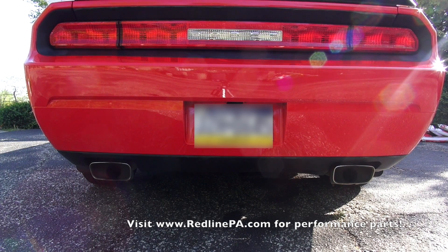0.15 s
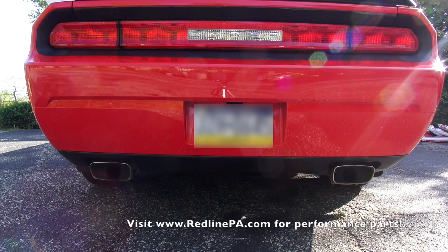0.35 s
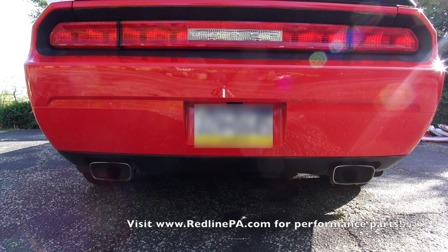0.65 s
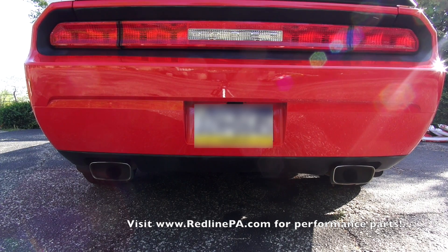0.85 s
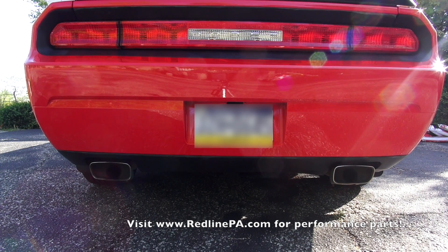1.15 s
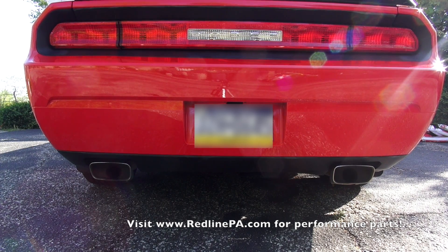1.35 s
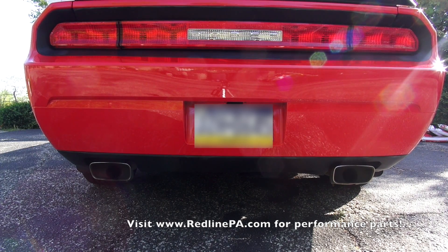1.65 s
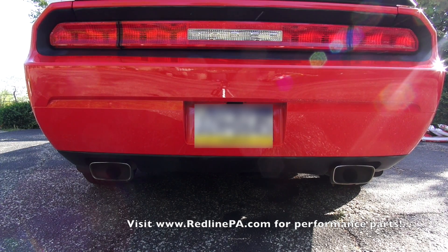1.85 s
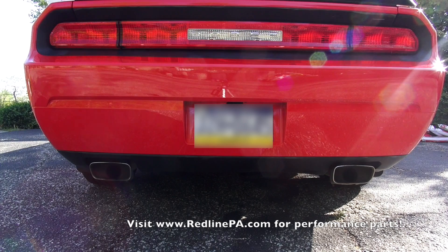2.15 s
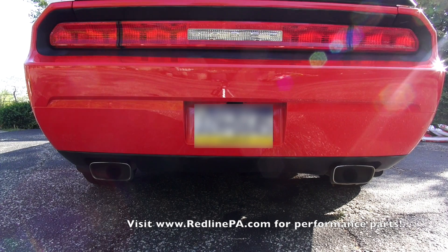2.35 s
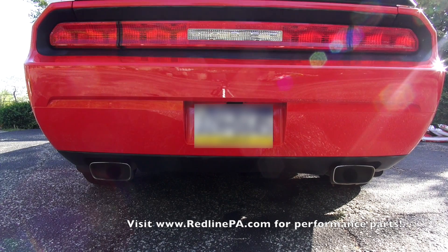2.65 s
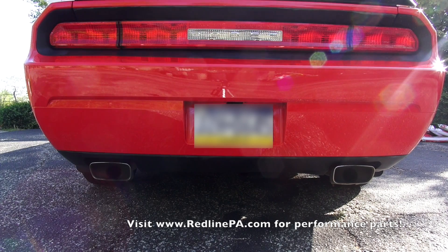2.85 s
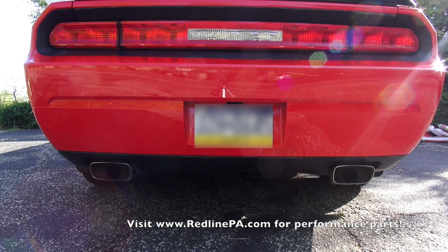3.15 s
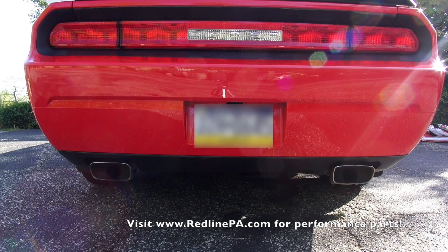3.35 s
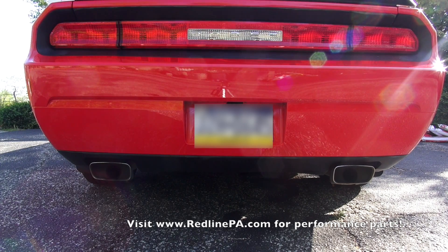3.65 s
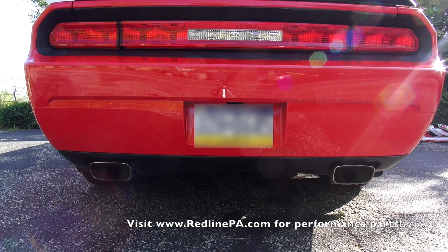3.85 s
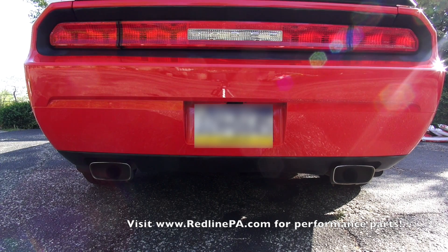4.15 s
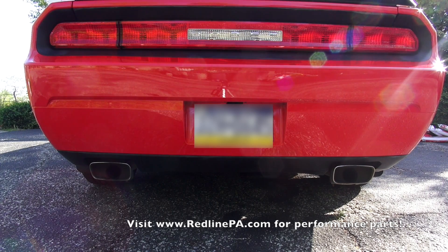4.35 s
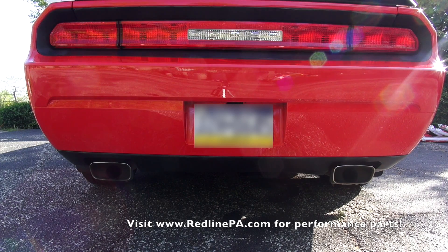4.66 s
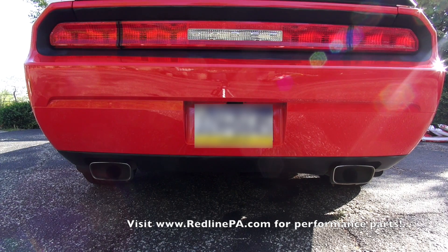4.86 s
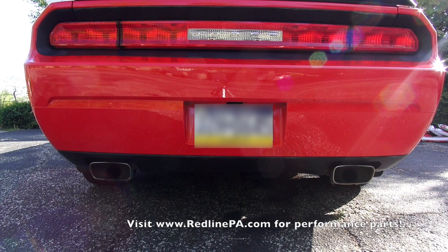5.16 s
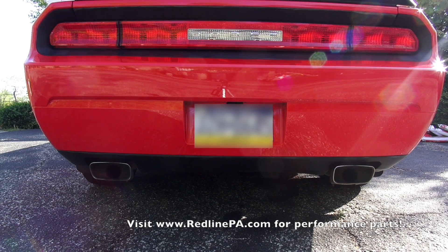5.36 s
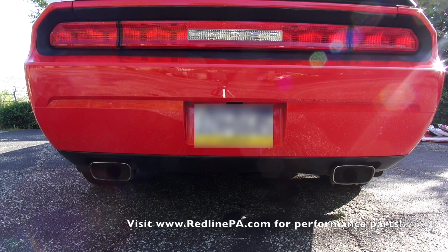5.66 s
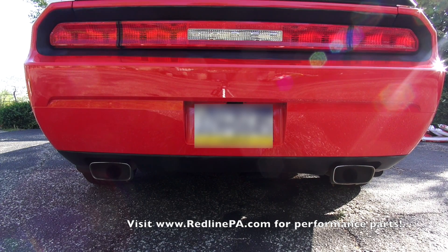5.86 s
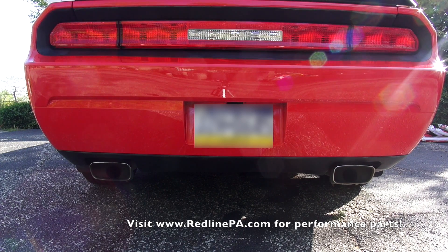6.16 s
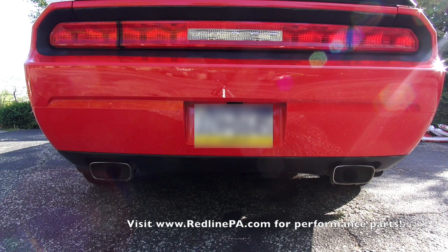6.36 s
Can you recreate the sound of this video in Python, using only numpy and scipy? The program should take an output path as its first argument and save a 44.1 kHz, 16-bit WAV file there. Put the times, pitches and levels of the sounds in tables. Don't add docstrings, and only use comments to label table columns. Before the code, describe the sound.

Close behind two tailpipes in a driveway, a large eight-cylinder engine is already spinning fast and dropping. It is revved hard to a raspy, cracking roar, then the pitch slides down for several seconds into a loose, lumpy burble with soft pops. A small throbbing blip follows and settles back to uneven idle. Outdoor stereo pickup, with faint scattered echoes and slight limiting on peaks.

```python
import sys
import numpy as np
from scipy import signal
from scipy.fft import rfft, irfft, next_fast_len
from scipy.io import wavfile
from scipy.ndimage import uniform_filter1d

SR = 44100
rng = np.random.default_rng(int(sys.argv[2]) if len(sys.argv) > 2 else 0)


def field_ratio(decibels):
    return 10 ** (np.asarray(decibels, dtype=float) / 20)


def output_pcm(signal):
    pcm = np.clip(np.atleast_2d(signal).T, -1, 1) * 32767
    wavfile.write(sys.argv[1], SR, np.round(pcm).astype(np.int16))


N = 286650

# (time [s], firing rate [Hz])
ENGINE_SPEED = [(0.0, 263), (0.14, 259.5), (0.42, 220.3), (0.72, 185.5), (0.79, 183.3), (0.86, 201.9),
                (1.12, 322), (1.21, 358.5), (1.28, 372.7), (1.36, 365), (1.55, 326.5), (2.57, 180.3),
                (4.95, 39.0), (5.36, 48.6), (5.5, 61.5), (5.7, 72.3), (6.13, 58.9), (6.5, 53.5)]
# (time [s], pressure pulse [dB], gas flow [dB], relative gas speed at the tips [-0.4 to 1])
DRIVE = [(0.0, -8.5, -10, 0.6), (0.08, -11, -18, 0.0), (0.76, -10.5, -24, 0.15), (0.84, -10.5, -15, 0.0),
         (1.06, -8.5, -12, 1), (1.26, -10, -11.5, 1.0), (1.29, -11, -13, 0.4), (1.81, -12, -17.5, 0.02),
         (2.6, -12.5, -27.5, 0.04), (2.97, -13, -24.5, 0.39), (3.88, -21, -40, 0.35),
         (4.1, -28, -40.5, -0.4), (4.25, -25.5, -42, -0.2), (4.9, -29, -44.5, -0.4), (5.28, -21, -37, -0.3),
         (5.65, -8.5, -30, 0.5), (5.87, -15, -32.5, -0.1), (6.4, -21, -35.5, 0.1)]
# (opens [s], shuts [s])
THROTTLE = [
    (-0.4, 0.075),
    (0.783, 1.28),
    (5.35, 5.75),
]
# (multiple of the two-turn cycle [1], level [dB])
SIDE_LINES = [(2, -10), (3, -12), (4, -17), (5, -3), (6, 2), (7, -3.5), (9, 3), (10, 1), (11, 5), (12, -13),
              (13, 2.5), (14, 9), (15, 0), (17, 10), (18, -1.5), (19, -6), (20, 8.5), (21, 2.5),
              (22, -26.5), (23, 11), (24, 4), (25, -17.5), (26, -4), (27, -17.5), (28, 9.5), (29, -12.5),
              (30, -19), (31, -8.5), (32, 8)]
# (frequency [Hz], width [Hz], level [dB])
PIPE_MODES = [(61, 59, -11), (115.2, 27.4, 4.5), (221.8, 65.3, 1.5), (369.7, 29.5, -1), (484.6, 27.3, -9.5),
              (599, 112, -21.5)]
PUFF_LEVELS = [-0.5, -8, -4.5, -19, -0.5, -4.5, -7, -8]
# (frequency [Hz], level [dB per Hz])
GAS_COLOUR = [(290, 7.5), (500, 7.5), (586, 3), (676, -1.5), (889, -3), (1140, 0), (1310, 2), (1560, -3),
              (1750, -7), (2510, -42), (3070, -22.5), (5000, -30), (7380, -39), (12000, -51.5),
              (15600, -61.5)]
# (frequency [Hz], width [Hz], level [dB])
GROUND_RIPPLES = [(774, 186, -3.5), (2506, 454, 13.5), (4750, 370, -2.5)]
# (frequency [Hz], width [Hz], level [dB])
TIP_RINGS = [(1092, 71, 4), (1806, 80, 3), (2950, 290, 3), (4050, 59, 3), (5730, 89, 1.5), (7640, 400, 1.5),
             (9100, 940, 2.5)]
# (from [s], a crack at [s], to [s], first level [dB], last level [dB])
CRACK_RUNS = [
    (0.02, 0.0373, 0.05, -15, -15),
    (0.9, 1.0268, 1.07, -22, -7),
    (1.075, 1.2034, 1.275, -10, -7),
    (1.3, 1.4938, 1.74, -13, -23),
    (1.29, 1.608, 1.72, -18, -22),
    (1.86, 1.8774, 1.89, -22, -22),
]
# (from [s], a pop at [s], to [s], first level [dB], last level [dB])
BLIP_RUNS = [
    (5.42, 5.5161, 5.615, -21, -16),
    (5.618, 5.5161, 5.77, -18, -23),
]
# (time [s], peak level [dB])
IDLE_POPS = [(3.4481, -36), (3.5604, -33), (3.725, -33), (3.8337, -31.5), (3.8876, -31), (3.939, -31.5),
             (3.9933, -42), (4.02, -35.5), (4.1696, -36), (4.2044, -31.5), (4.221, -32), (4.27, -35),
             (4.3026, -37), (4.358, -34), (4.47, -35), (4.4942, -35), (4.6059, -34), (4.725, -35),
             (4.7944, -34), (4.9337, -29.5), (4.9603, -28.5), (5.0433, -27), (5.0682, -28.5), (5.0956, -23),
             (5.1242, -20.5), (5.1672, -32), (5.215, -17), (5.2877, -20.5), (5.3336, -16.5), (5.3497, -22)]
# (time [s], peak level [dB])
POPS = [(2.8894, -26), (3.1266, -26), (5.3722, -16), (5.4142, -18), (5.6923, -19), (5.721, -20.5),
        (5.8046, -26), (5.8695, -28.5), (5.908, -21), (5.9204, -39), (5.9539, -30), (5.9692, -31),
        (6.0097, -46), (6.0651, -30), (6.1116, -27.5), (6.1429, -33), (6.2108, -25.5), (6.2626, -27),
        (6.2826, -26.5), (6.3114, -32), (6.3567, -32), (6.4313, -34), (6.4582, -50), (6.4806, -29)]
# (time [s], peak level [dB])
THUMPS = [(3.673, -10), (3.781, -11), (3.833, -15), (3.994, -15), (4.155, -17), (4.603, -16), (4.724, -17),
          (4.794, -18), (4.947, -16), (5.124, -10), (5.22, -11), (5.328, -10), (5.485, -4), (5.714, -5),
          (5.96, -5), (6.361, -12), (6.434, -11)]
# (frequency [Hz], left over right [dB])
TILT = [(60, 0.5), (110, 2.5), (200, 1.0), (380, -2.0), (700, -2.0), (1290, 0.0), (2380, -1.0),
        (4400, -0.5), (8120, -0.5), (15000, 0.0)]
# (frequency [Hz], level [dB])
ECHO_COLOUR = [(60, -31.5), (500, -20.5), (2000, -25.5), (3100, -29), (4400, -23), (5600, -15), (8500, -13),
               (10500, -12.5), (11800, -42)]

KNEE_HZ = 195


def evened(x):
    return x / np.sqrt(np.mean(x ** 2) + 1e-20)


def read(points, hz):
    f, value = np.transpose(points)
    return np.interp(np.log(hz + 1), np.log(f + 1), value)


def curves(rows):
    s, *columns = np.transpose(rows)
    return [np.interp(np.arange(N) / SR, s, c) for c in columns]


def colour(x, gain):
    size = next_fast_len(N + SR // 2)
    return irfft(rfft(x, size) * gain(np.fft.rfftfreq(size, 1 / SR)), size)[..., :N]


def levelled(x, seconds):
    return x / np.sqrt(uniform_filter1d(x ** 2, int(seconds * SR)) + 1e-12)


def band(x, lo_hz, hi_hz):
    return signal.sosfilt(signal.butter(3, [lo_hz, hi_hz], "bandpass", fs=SR, output="sos"), x)


def impulses(rows, offset_db):
    s, db = np.transpose(rows)
    out = np.zeros(N)
    out[(s * SR).astype(int)] = field_ratio(db + offset_db)
    return out


def controls():
    t = np.arange(N) / SR
    s, rate = np.transpose(ENGINE_SPEED)
    hz = np.exp(np.interp(t, s, np.log(rate)))
    snap_s = 0.01
    opened = 1. * sum((t > a) & (t < b) for a, b in THROTTLE)
    return (hz, *curves(DRIVE), uniform_filter1d(opened, int(snap_s * SR)))


def pipe(hz):
    total = 0
    for k, (f, width, db) in enumerate(PIPE_MODES):
        total = total + (-1) ** k * field_ratio(db) * 1j * hz * width / (f ** 2 - hz ** 2 + 1j * hz * width)
    return total


def yard_air():
    return field_ratio(-72) * evened(band(rng.standard_normal((2, N)), 5000, 10000))


def wall_echoes(car):
    taps = rng.standard_normal(6000) * (rng.random(6000) < .05) * np.exp(-np.arange(6000) / 600)
    echo = signal.oaconvolve(car, taps / np.linalg.norm(taps))[:N]
    return colour(echo, lambda f: field_ratio(read(ECHO_COLOUR, f)))


def gas_gain(hz):
    bumps = sum(db * np.exp(-((hz - f) / w) ** 2) for f, w, db in GROUND_RIPPLES + TIP_RINGS)
    return field_ratio(read(GAS_COLOUR, hz) + bumps)


def gas_noise(patchy_db):
    a, b, patches = rng.standard_normal((N // 64 + 5, 129, 3)).T
    patches = uniform_filter1d(patches, size=2, axis=0)
    patches = evened(uniform_filter1d(patches, size=7, axis=1))
    spectrum = (a + 1j * b) * field_ratio(patchy_db * np.minimum(patches, 1.8))
    return colour(signal.istft(spectrum, nperseg=256, noverlap=192)[1][:N], gas_gain)


def rasp(firings):
    fired = np.diff(np.floor(firings), prepend=0) > 0
    cylinder = firings.astype(int) % 8
    shared, *own = rng.standard_normal((9, 400)) * np.exp(-np.arange(400) / 110)
    out = np.zeros(N)
    for which, (db, train) in enumerate(zip(PUFF_LEVELS, own)):
        out += signal.oaconvolve(fired * (cylinder == which), field_ratio(db) * (.6 * shared + train))[:N]
    return levelled(band(colour(out, gas_gain), 377, 3380), 0.16)


def gas(firings, hz, flow_db, push):
    count = firings.astype(int)
    chance = np.clip(rng.standard_normal((count[-1] + 1, 3)), -3, 1.5)[count].T
    spread_db = 2.4 * (60 / hz) ** 0.2 * (0.43 * chance + 0.36 * chance.sum(0))
    since_firing_s = (firings % 1) / hz
    puff = field_ratio(np.array(PUFF_LEVELS)[count % 8] + spread_db) * np.exp(-since_firing_s / 0.0036)
    puff = uniform_filter1d(puff, size=36, axis=1)
    noise = gas_noise(patchy_db=2.0)

    locked = np.clip(hz / 430, .1, .5)
    roar = levelled((.7 + puff[0]) * band(noise, 550, 2300), .15)
    roar = np.sqrt(1 - locked) * roar + np.sqrt(locked) * rasp(firings)

    bite = levelled((0.89 + puff[1]) * band(rng.standard_normal(N), 1760, 2440), .15)
    bite_db = -27 + 14.5 * push

    steady = np.clip((-33 - uniform_filter1d(flow_db, SR // 3)) / 18, 0, .45)
    hiss = (.14 + steady + hz / 900 + puff[1]) * band(noise, 2300, 6000)
    hiss_db = -10 - 0.093 * (flow_db + 22.5) + 7.5 * push

    fizz = band(noise, 6350, 10820) + field_ratio(0.22 * (flow_db + 25.5)) * band(noise, 10620, 14400)
    fizz = fizz + field_ratio(np.minimum(1.5 * (flow_db + 19), 4)) * band(noise, 13800, 16500)
    fizz = (.17 + puff[2]) * fizz
    fizz_db = -25 - 0.47 * (flow_db + 26.5) + (13.5 + 6.5 * np.log2(hz / 200)) * push

    blast = roar + field_ratio(bite_db) * bite
    blast = blast + field_ratio(hiss_db - 3.9) * levelled(hiss, 0.29) + field_ratio(fizz_db - 4.1) * levelled(fizz, .2)
    return field_ratio(flow_db - 0.2) * blast


def runs(rows, firings, count, spread_db):
    t, found = np.arange(N) / SR, []
    for start, anchor, end, first_db, last_db in rows:
        s = np.interp(firings[int(anchor * SR)] + count * np.arange(-40, 41), firings, t)
        db = np.interp(s, [start, end], [first_db, last_db])
        db = db + spread_db * np.clip(rng.standard_normal(len(s)), -2, 1.5)
        found += [row for row in zip(s, db) if start < row[0] < end]
    return np.array(found)


def cracks(rows, roar_db, sigh_db, patchy_db, decay_s, drop_db, top_hz, bright):
    s, db = np.transpose(rows)
    t, out = np.arange(SR // 5) / SR, np.zeros(N)
    noise = signal.lfilter([1, -min(bright, 1)], 1, gas_noise(patchy_db))
    snap, roar, sigh = (0, 2300, top_hz, 1), (roar_db, 800, 2300, 1.5), (sigh_db, 2300, top_hz, 8)
    for level_db, lo_hz, hi_hz, slow in (snap, roar, sigh):
        starts = impulses(np.transpose([s, db + level_db]), drop_db)
        burst = (1 - np.exp(-t / 0.0003)) * np.exp(-t / (decay_s * slow))
        out += signal.oaconvolve(starts, burst)[:N] * levelled(band(noise, lo_hz, hi_hz), 0.012)
    return out


def all_cracks(firings):
    sharp = runs(CRACK_RUNS, firings, count=8, spread_db=1.5)
    roar_db = -15.5 - sharp[:, 1]
    out = cracks(sharp, roar_db, sigh_db=-30, patchy_db=2.5, decay_s=.002, drop_db=-2.5, top_hz=15700, bright=.6)
    out += cracks(IDLE_POPS + POPS, roar_db=6, sigh_db=-11, patchy_db=6.0, decay_s=0.0047, drop_db=-7.5,
                  top_hz=13500, bright=0.46)
    blip = runs(BLIP_RUNS, firings, count=1, spread_db=2.5)
    return out + cracks(blip, roar_db=4, sigh_db=-14, patchy_db=5.0, decay_s=.005, drop_db=-3,
                        top_hz=11000, bright=.25)


def thumps():
    blows = np.zeros(N)
    for rows, offset_db in ((THUMPS, -1.5), (IDLE_POPS + POPS, 7)):
        hits = impulses(rows, offset_db)
        blows = np.where(hits > 0, hits, blows)
    t, ring = np.arange(SR // 5) / SR, 0
    for hz, decay_s, size in ((122, 0.038, 1), (205, 0.011, 0.54), (62, 0.04, 0.27)):
        ring = ring + size * np.exp(-t / decay_s) * np.sin(2 * np.pi * hz * t)
    return signal.oaconvolve(blows, (1 - np.exp(-t / 0.0036)) * ring)[:N]


def rumble(firings, hz, pulse_db):
    knocks = np.diff(np.floor(firings), prepend=0) * rng.uniform(-1.76, 1.88, N)
    smear = rng.standard_normal(500) * np.exp(-np.arange(500) / 120)
    smear = smear + 14 * signal.unit_impulse(500)
    churn = 0.052 * rng.standard_normal(N)
    flow = signal.oaconvolve(knocks, smear / np.linalg.norm(smear))[:N] + churn
    full = colour(flow, lambda f: pipe(f) / (1 + (f / 2500) ** 2))
    deep = colour(flow, lambda f: pipe(f) / (1 + (f / 150) ** 4))
    even = np.clip(hz / 150 - .4, 0, .85) + 3.9 * np.minimum(np.log2(hz / 60), 0)
    share_db = -4 - 4.5 * np.log2(hz / 45)
    return field_ratio(pulse_db + share_db) * levelled(full - even * deep, .09)


def line_levels(hz, pulse_db, opened):
    octaves = np.log2(hz / KNEE_HZ)
    slow = np.minimum(octaves, 0)
    held_db = pulse_db + 35 * np.minimum(np.log2(hz / 59.1), 0)
    once, twice = (20 * np.log10(abs(pipe(m * hz))) for m in (1, 2))
    dip_db = -10 * np.exp(-(np.log2(hz / 80.7) / 0.25) ** 2)
    fire_db = held_db - 4 + 3.5 * opened + 0.27 * once - octaves + dip_db
    octave_db = held_db - 10 + 2 * opened + 1.56 * twice - 2.5 * octaves
    even_db = held_db - 6.5 - 3 * opened + 2.6 * slow
    odd_db = held_db - 6.5 - 1.5 * opened + 5.94 * slow
    return fire_db, octave_db, even_db, odd_db


def beat(firings, hz, pulse_db, opened):
    step = 64
    hz, opened = hz[::step], opened[::step]
    fire_db, octave_db, even_db, odd_db = line_levels(hz, pulse_db[::step], opened)
    k, db = np.transpose(SIDE_LINES)[:, :, None]
    db = db + 6.5 * (k < 8) * np.clip(np.log2(KNEE_HZ / hz), 0, 1) * (1 - opened)
    db = db - 5 * opened * np.minimum(abs(np.log2(k / 6.5)), 1)
    answer = field_ratio(db) * pipe(k * hz / 8)
    for odd, near, level_db in ((0, (6, 10, 14), even_db), (1, (5, 7, 9, 11), odd_db)):
        total = np.linalg.norm(answer[np.isin(k[:, 0], near)], axis=0)
        answer = np.where(k % 2 == odd, answer * field_ratio(level_db) / total, answer)
    k = np.append(k, (8, 16))
    answer = np.vstack([answer, field_ratio(fire_db), field_ratio(octave_db)])

    flutter = evened(uniform_filter1d(rng.standard_normal(answer.shape), 40, axis=1))
    wander = evened(uniform_filter1d(rng.standard_normal(answer.shape), 60, axis=1))
    loose = np.where(k % 8 == 0, .012, .055)[:, None] * k[:, None] * (200 / hz) ** .4
    flutter_db = np.minimum(0.47 + 2.9 * loose, 4) * np.minimum(flutter, 1.5)
    flutter_db = flutter_db - 1.7 * np.maximum(loose - 1.5, 0)
    start_phase = 2 * np.pi * (rng.random(len(k)) * (k % 8 > 0))[:, None]
    answer = answer * field_ratio(flutter_db) * np.exp(1j * (loose * wander + start_phase))

    at, out = np.arange(N) / step, np.zeros(N)
    for multiple, a in zip(k, answer):
        points = np.arange(len(a))
        size = np.interp(at, points, abs(a))
        lag = np.interp(at, points, np.unwrap(np.angle(a)))
        out += size * np.cos(2 * np.pi * multiple * firings / 8 + lag)
    return np.sqrt(2) * out


def scene():
    hz, pulse_db, flow_db, push, opened = controls()
    firings = np.cumsum(hz) / SR
    firings += 1 - firings[int(5.516 * SR)] % 1
    car = beat(firings, hz, pulse_db, opened)
    car += rumble(firings, hz, pulse_db - 2.5 * opened)
    car += thumps() + gas(firings, hz, flow_db, push) + all_cracks(firings)
    direct = [colour(car, lambda f: field_ratio(side * read(TILT, f) / 2)) for side in (1, -1)]
    return direct + wall_echoes(car) * [[1], [-1]] + yard_air()


def low_pass(x):
    return signal.sosfilt(signal.butter(12, 15750, fs=SR, output="sos"), x)


def record(dry):
    ceiling = .94
    limited = ceiling * np.tanh(dry / ceiling)
    bass_cut = signal.butter(3, 42, "highpass", fs=SR, output="sos")
    return low_pass(signal.sosfilt(bass_cut, limited))


dry = scene()
out = record(dry)
output_pcm(out)
```